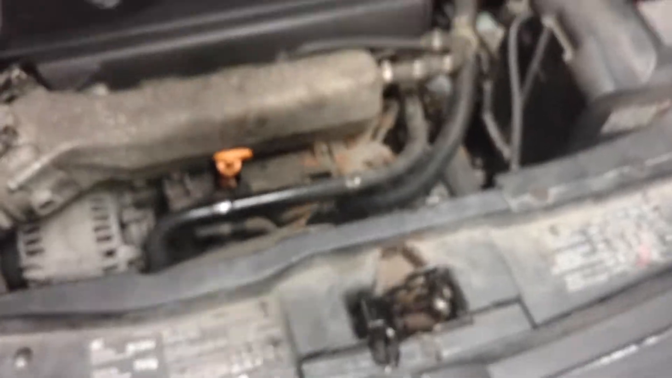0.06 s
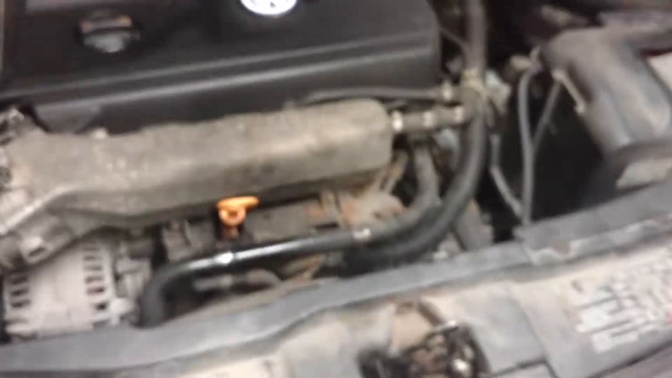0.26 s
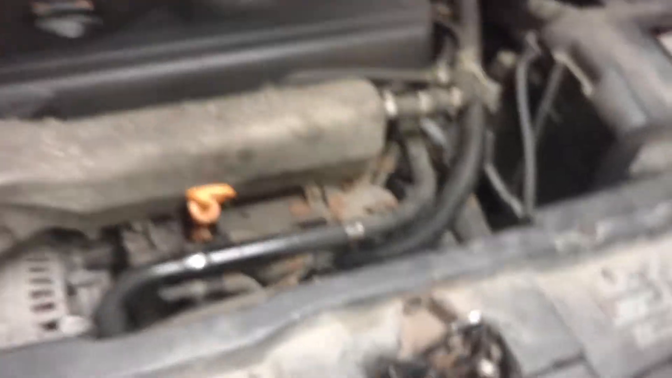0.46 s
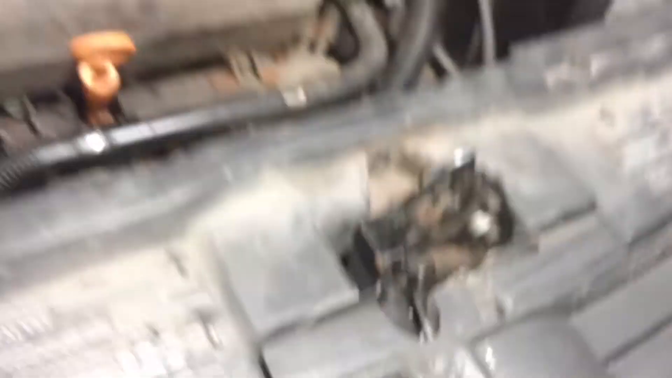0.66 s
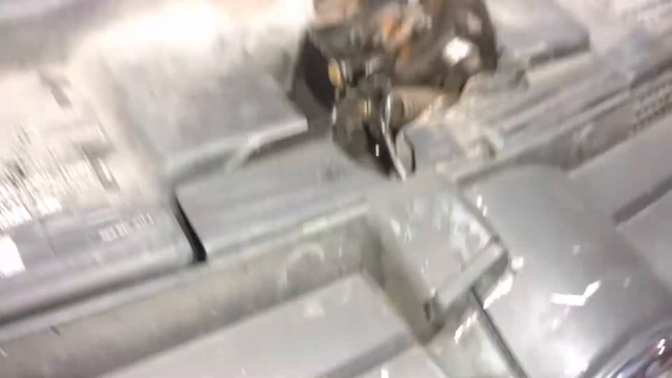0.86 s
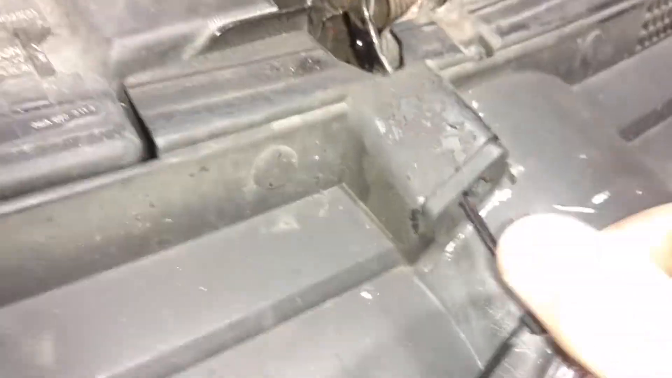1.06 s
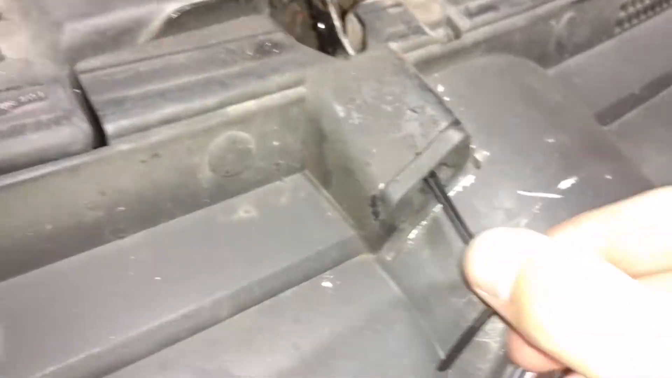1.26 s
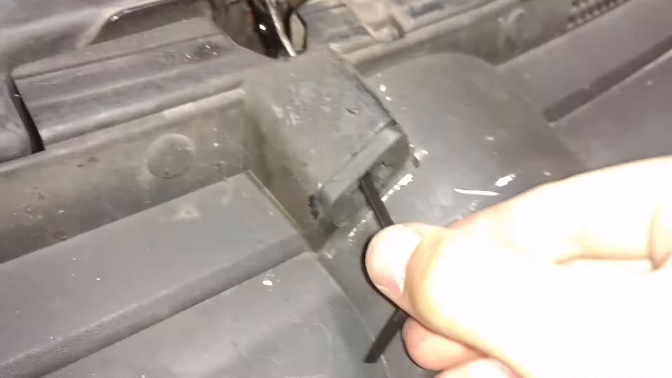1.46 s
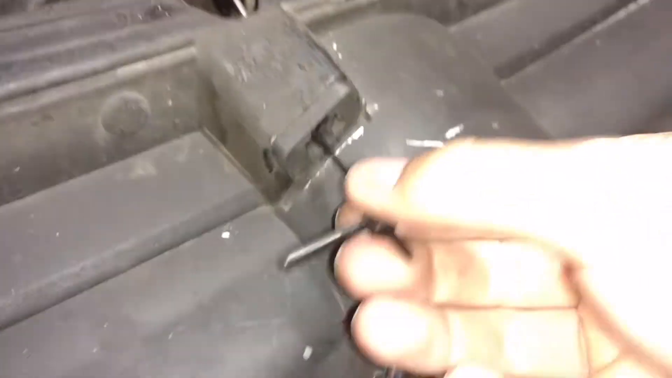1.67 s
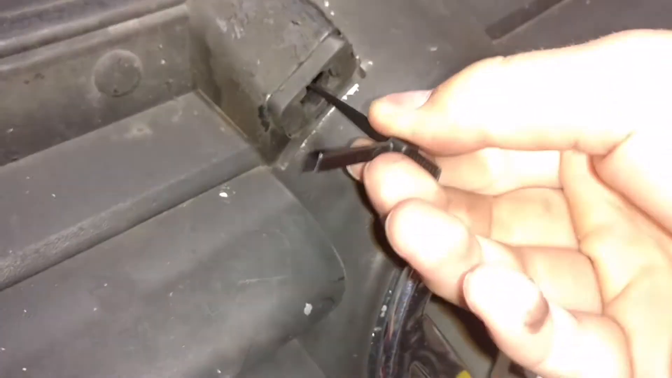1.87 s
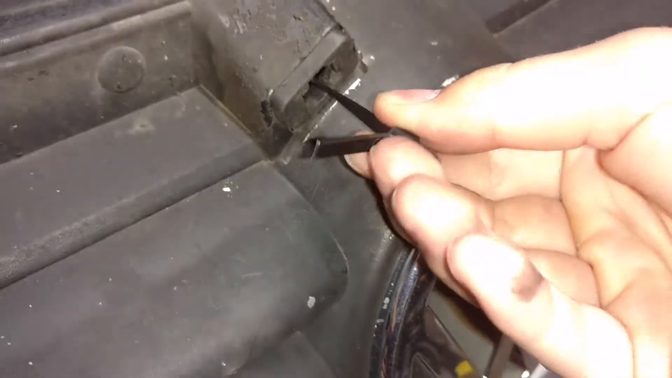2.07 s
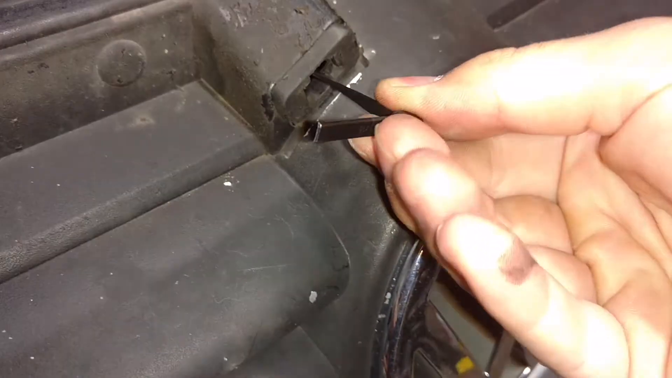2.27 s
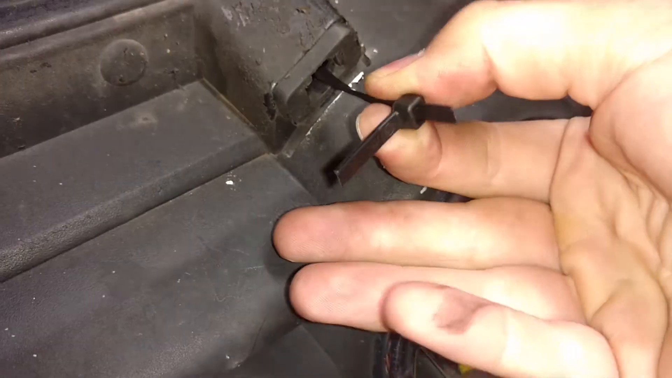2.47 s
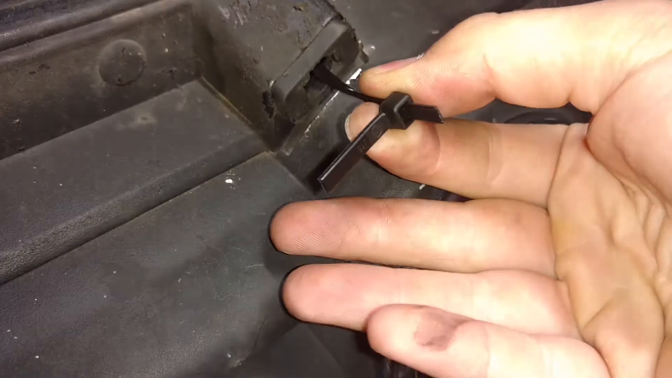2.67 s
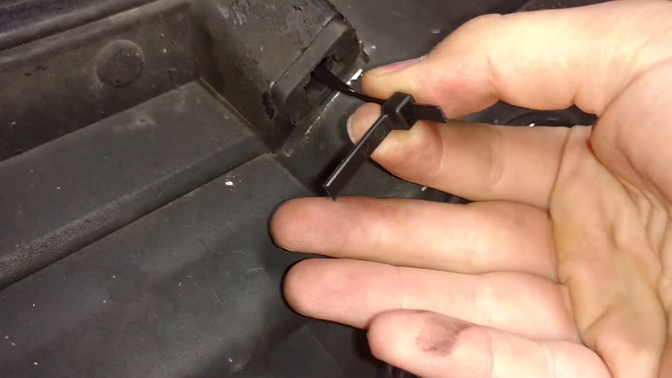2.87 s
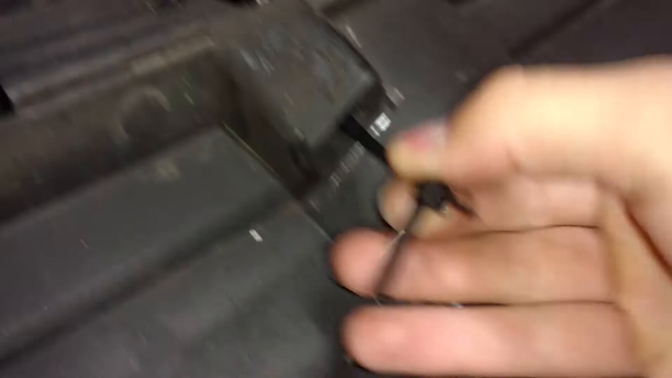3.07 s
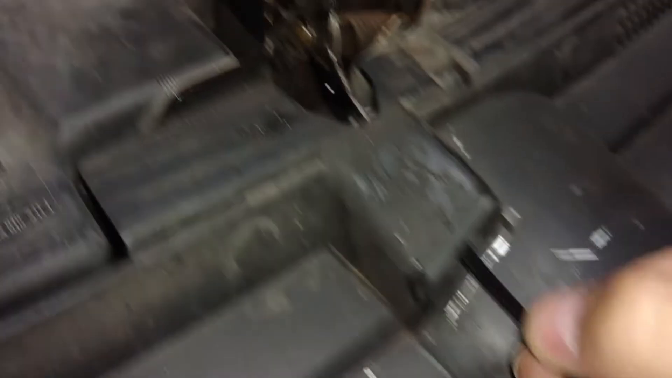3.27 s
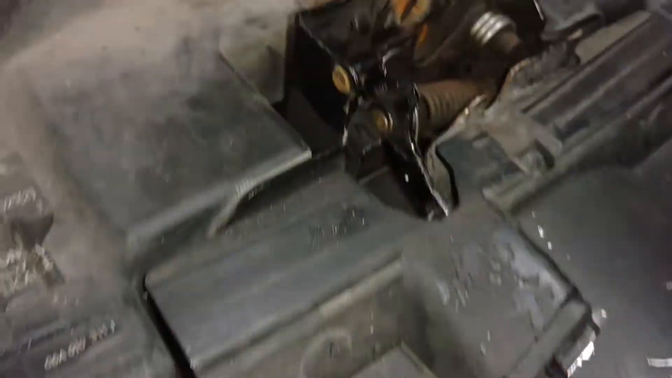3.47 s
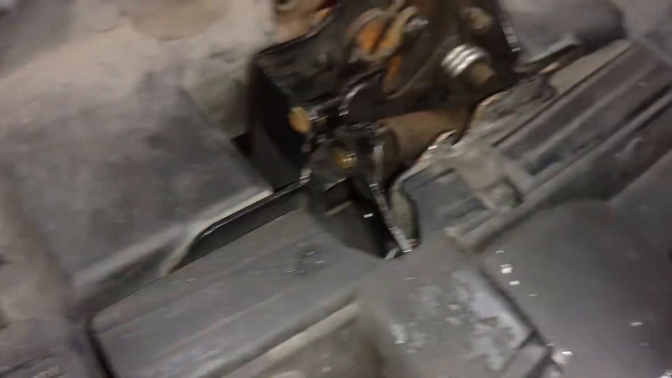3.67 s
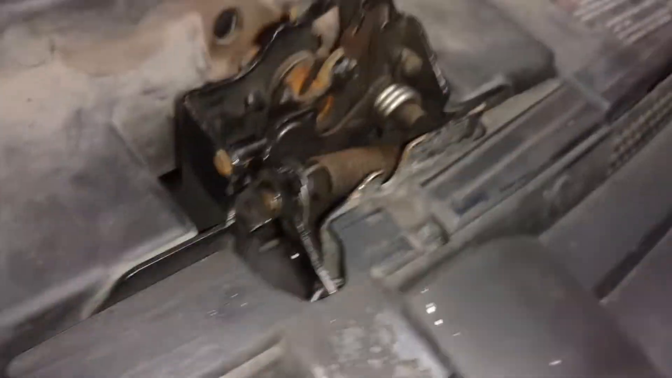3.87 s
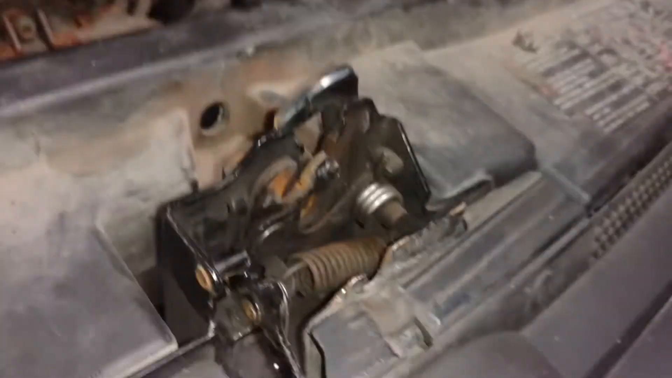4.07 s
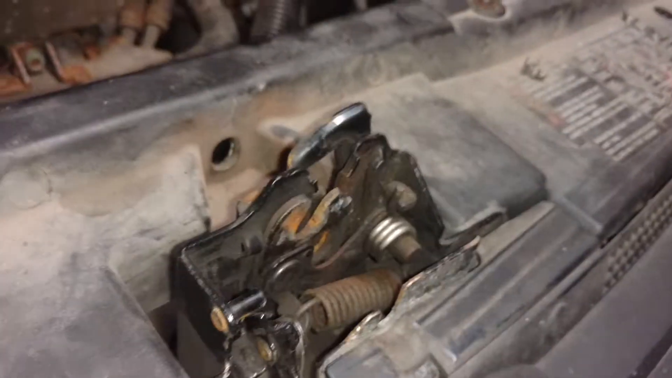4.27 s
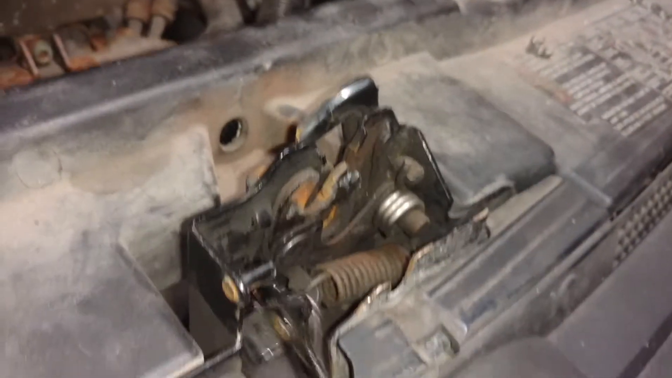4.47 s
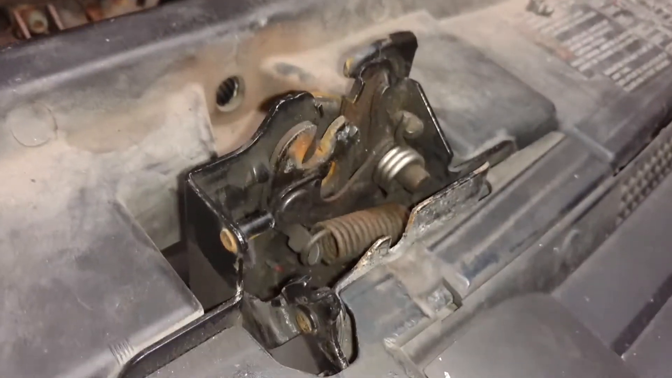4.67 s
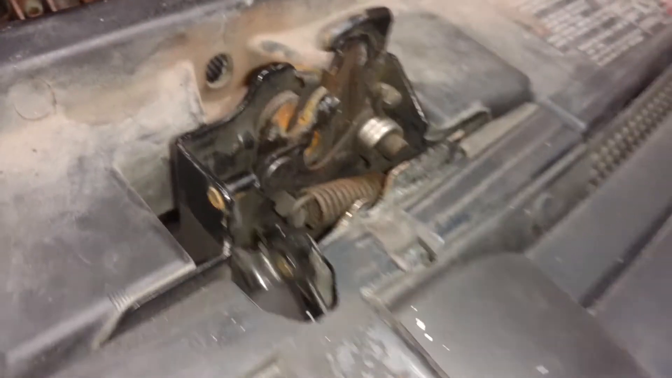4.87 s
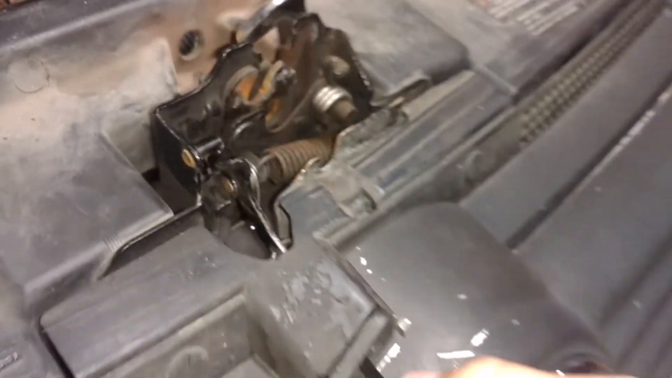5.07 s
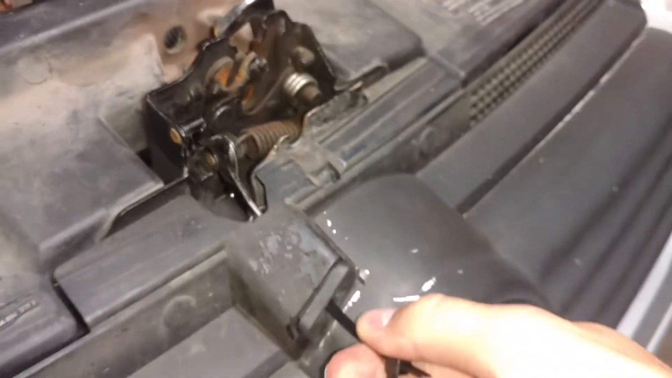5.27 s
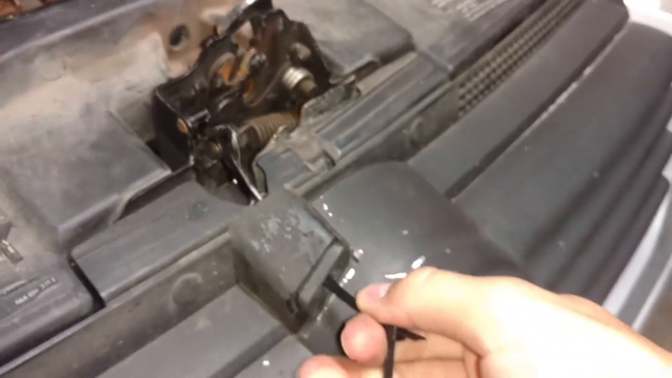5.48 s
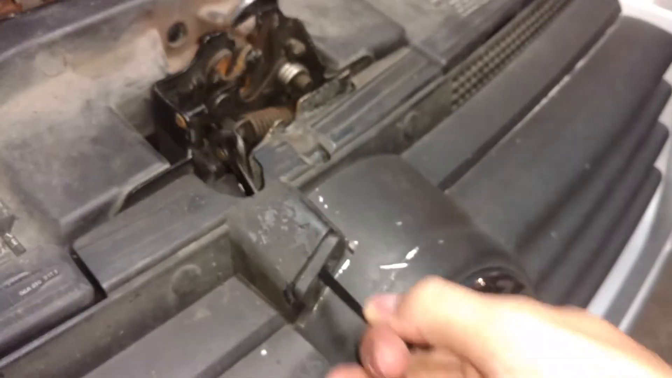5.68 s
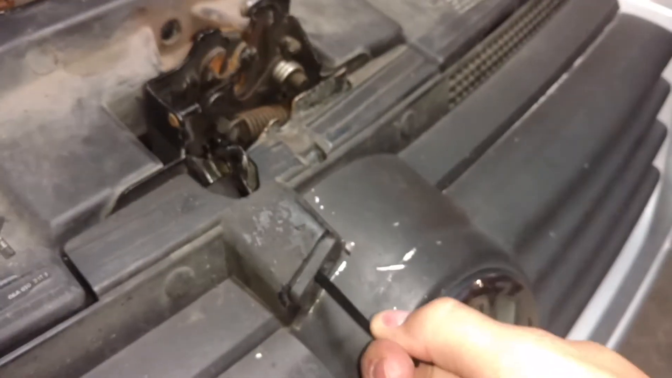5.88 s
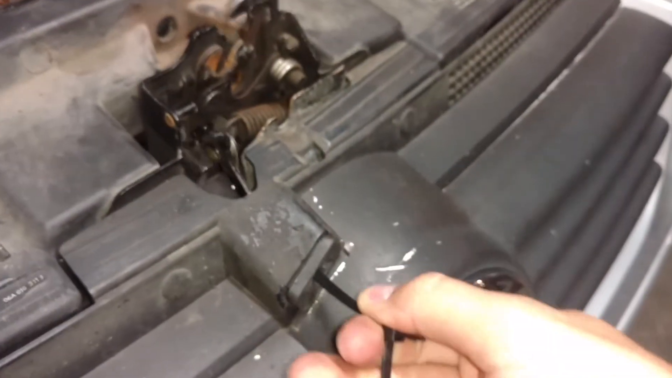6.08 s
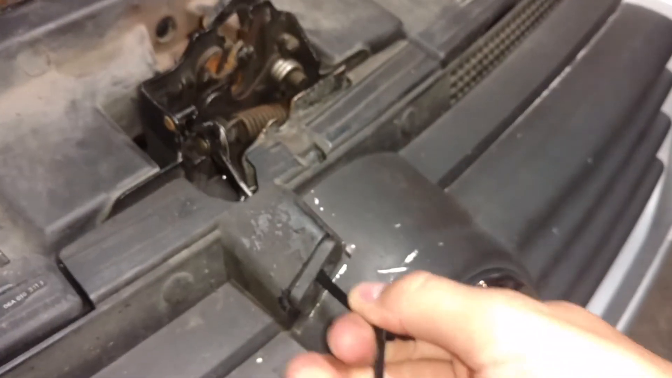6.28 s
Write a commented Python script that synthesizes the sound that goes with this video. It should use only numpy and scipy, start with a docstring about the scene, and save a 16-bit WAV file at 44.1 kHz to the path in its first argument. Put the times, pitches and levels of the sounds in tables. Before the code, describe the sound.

In a closed garage, a shoe scuffs once across the gritty floor. Fingers fumble a plastic pull tie on a car's front panel, making faint ticks and rubs. Then come three tugs: the cable drags in its guide and the steel hood latch knocks and snaps back, shaking the panel, the first tug the loudest. The stereo phone microphone is close, with soft air noise, a lamp hum and a short echo behind.

```python
"""A closed garage, at the front of a car, on a phone's two microphones. A shoe scuffs the gritty floor,
fingers fumble a plastic pull tie on the front panel, then tug it three times: the cable drags in its
guide and the steel hood latch knocks and snaps back, each contact shaking the panel.
Behind them are distant air noise, a soft lamp hum and the short echo of the walls.
The phone's stereo widening takes from each side a slightly later copy of the other."""
import sys
import numpy as np
from scipy import signal
from scipy.fft import rfft, irfft, next_fast_len
from scipy.io import wavfile
from scipy.ndimage import uniform_filter1d

SR = 44100
rng = np.random.default_rng(int(sys.argv[2]) if len(sys.argv) > 2 else 0)


def log_audio(samples):
    """Write samples as a 16-bit WAV file to the path given in sys.argv[1]."""
    # one column per channel
    frames = np.atleast_2d(samples).T
    # limit to full scale, then quantise
    limited = np.clip(frames, -1, 1)
    pcm = np.round(limited * 32767).astype(np.int16)
    wavfile.write(sys.argv[1], SR, pcm)


N = 278712


def amp(db):
    return 10 ** (np.asarray(db) / 20)


def unit_rms(x):
    return x / np.sqrt(np.mean(x ** 2) + 1e-20)


def along(points, hz):
    """Interpolate (frequency, value) points on a log frequency axis."""
    point_hz, values = np.transpose(points)
    return np.interp(np.log(hz + 1), np.log(point_hz + 1), values)


def filtered(x, response):
    """Pass x through a complex response of frequency."""
    size = next_fast_len(x.shape[-1] + 8192)
    return irfft(rfft(x, size) * response(np.fft.rfftfreq(size, 1 / SR)), size)[..., :x.shape[-1]]


def diffuse(pair, above_hz=950, bass_rad=0.13):
    """Two noises as a diffuse field at two microphones: alike in the bass, unrelated in the treble."""
    angle = lambda hz: bass_rad + (np.pi / 4 - bass_rad) / (1 + (above_hz / (hz + 1)) ** 2)
    mid, side = filtered(pair, lambda hz: np.array([np.cos(angle(hz)), np.sin(angle(hz))]))
    return np.array([mid + side, mid - side])


def room_tone(patchy_db=0.6):
    """Distant air noise in soft patches, with a wavering lamp hum."""
    # Background level, which dips after the loudest snap and creeps back: time_s, level_db
    levels = [(0, -41), (1, -42.5), (2.5, -41.5), (4.45, -42.5), (4.6, -53.5), (4.85, -52), (5.3, -48.5),
              (5.9, -43), (6.32, -50.5)]
    # Spectrum of the air noise: frequency_hz, relative_db
    air_spectrum = [(20, -21), (50, -8.5), (120, 2), (250, 2), (500, -9.5), (1100, -17), (2000, -24.5),
                    (4000, -33), (8000, -37), (12000, -44), (15000, -45.5), (15700, -64), (22000, -86)]
    # Lamp hum and whine at the start: pitch_hz, level_db
    lamp = [(120, -50.5), (240, -53), (360, -72.5), (1150, -64), (3230, -74.5), (4200, -85.5)]
    spectra = signal.stft(rng.standard_normal((2, N)), nperseg=512)[2]
    patches = uniform_filter1d(uniform_filter1d(rng.standard_normal(spectra.shape[1:]), 6, 0), 12, 1)
    depth = np.minimum(np.arange(len(patches)) / 9, 1)[:, None]  # the bass stays steady
    pair = signal.istft(spectra * amp(patchy_db * unit_rms(patches) * depth), nperseg=512)[1][:, :N]
    air = unit_rms(filtered(diffuse(pair), lambda hz: amp(along(air_spectrum, hz))))
    t = np.arange(N) / SR
    drift = np.cumsum(rng.standard_normal(N)) * 0.01143
    hum = 0
    for hz, db in lamp:
        phase = 2 * np.pi * hz * t + np.sqrt(hz / lamp[0][0]) * drift
        hum += np.sqrt(2) * amp(db - levels[0][1]) * np.sin(phase)
    return amp(np.interp(t, *np.transpose(levels))) * (air + hum)


def garage(x):
    """Echo off the walls, one tail per microphone; each frequency dies at its own speed."""
    # Reverberation time of the garage: frequency_hz, t60_s
    decay = [(200, 0.18), (1200, 0.42), (2500, 0.37), (4000, 0.55), (12000, 0.63)]
    hz, t, spectra = signal.stft(rng.standard_normal((2, SR // 2)), SR, nperseg=256)
    tail = signal.istft(spectra * amp(-60 * t / along(decay, hz)[:, None]), SR, nperseg=256)[1]
    tail = diffuse(filtered(tail, lambda f: 1 / (1 + (f / 4000) ** 2)))  # clutter swallows the treble
    delayed = np.pad(x, (400, 0))[None]
    return signal.fftconvolve(delayed, tail / np.linalg.norm(tail[0]), axes=1)[:, :N]


def strokes(rows, range_db=28, rise_bend=2.11, sag_db_per_s=28):
    """Gain per sample of each stroke: a rounded climb, a tiring hold, a steady fade."""
    peak_s, db, rise_s, hold_s, fade_s = np.transpose(rows)[:5, :, None]
    t = np.arange(0, N, 16) / SR - peak_s
    early, late = np.maximum(-t, 0) / rise_s, np.maximum(t - hold_s, 0) / fade_s
    gain = amp(db - range_db * (early ** rise_bend + late) - sag_db_per_s * np.clip(t, 0, hold_s))
    return np.repeat(gain, 16, axis=1)[:, :N]


def grit(per_second, size_db, smooth):
    """Sparse grains of uneven size on a bed of smooth noise."""
    struck = rng.random(N) < per_second / SR
    sizes = amp(size_db * np.minimum(rng.exponential(size=N), 3))
    grains = unit_rms(struck * sizes * rng.standard_normal(N))
    return unit_rms(grains + smooth * rng.standard_normal(N))


def shoe():
    """Grit crunches and hisses under the sliding sole."""
    # Slides of the sole: peak_s, level_db, rise_s, hold_s, fade_s
    scuffs = [(0.428, -36.5, 0.023, 0.0021, 0.048), (0.46, -49.5, .02, 0.085, .15),
              (0.626, -54, 0.0066, .003, 0.12), (0.66, -46, 0.0092, .003, 0.11),
              (0.764, -34, 0.014, .015, 0.09), (0.8, -18, 0.063, 0.11, 0.09), (0.99, -48, 0.058, .01, 0.34)]
    # Spectrum of sole on grit: frequency_hz, relative_db
    sole = [(200, -31), (600, -9.5), (950, -9), (1250, 2.5), (1700, -0.5), (2400, -5), (3100, -1),
            (3700, -9), (5000, -9.5), (8000, -17.5), (12000, -25), (15000, -30), (15700, -60)]
    crunch = grit(2000, size_db=1.5, smooth=2.5)
    return strokes(scuffs).sum(axis=0) * unit_rms(filtered(crunch, lambda hz: amp(along(sole, hz))))


def panel(lo_hz, hi_hz, favoured_hz=900, focus_db=0, spread_db=0):
    """Response of the panel's modes in one band; a positive focus favours those near one pitch."""
    # Resonances of the plastic panel and steel bracket: pitch_hz, width_hz, gain_db
    modes = [(138, 34, 4.5), (280.6, 58, 7), (528.6, 74, 6), (667.5, 68, -3), (729, 93, 5), (935, 95, 3.5),
             (1058, 59, 4), (1270, 190, 0), (1516, 120, 2), (1816, 260, -2.5), (2172, 225, -5.5),
             (2414, 164, -2), (2473, 540, -5.5), (3200, 820, -6), (4530, 220, -9), (6180, 3800, -16.5),
             (9000, 2500, -24.5)]
    hz, width, db = np.transpose(modes)
    distance = np.sqrt(abs(np.log2(hz / favoured_hz)))
    gain = amp(db + spread_db * rng.standard_normal(len(hz)) - focus_db * distance)
    in_band = [k for k in range(len(hz)) if lo_hz <= hz[k] < hi_hz]
    mode = lambda f, k: 1j * f * width[k] / (hz[k] ** 2 - f * f + 1j * f * width[k])
    soft = lambda f: 1 / (1 + 1j * f / (2 * hi_hz)) ** 2  # low parts move too slowly to give treble
    return lambda f: soft(f) * sum((-1) ** k * gain[k] * mode(f, k) for k in in_band)


def contacts(rows, blow):
    """A sharp blow and a dying rattle ring the panel; thud and snap levels are relative to the knock."""
    track, t = np.zeros(N + SR), np.arange(SR // 5) / SR
    fade = lambda t60_s: amp(-60 * t / t60_s)
    for start_s, knock_db, thud_db, snap_db, decay_s, pitch_hz in rows:
        thud = (0, 700, thud_db, 1.85, 15, 0.1, 0.013, 0.0053)
        knock = (700, 3120, 0, 0.71, 12, 0.98, 0.0092, 0.0066)
        snap = (3000, SR, snap_db, 0.7, -15, 6, 0.0076, 0.002)
        for lo_hz, hi_hz, band_db, stretch, focus_db, crack, crack_s, rise_s in (thud, knock, snap):
            envelope = (fade(stretch * decay_s) + crack * fade(crack_s)) * (1 - fade(rise_s))
            force = envelope * rng.standard_normal(len(t)) + blow * fade(0.00068)
            ring = filtered(force, panel(lo_hz, hi_hz, pitch_hz, focus_db, spread_db=0.5))
            track[round(start_s * SR):][:len(t)] += amp(knock_db + band_db) * ring / abs(ring).max()
    return track[:N]


def ticks():
    """Grit clicks, and fingertips tap the tie and panel."""
    # Light contacts: start_s, knock_db, thud_db, snap_db, base_decay_s, pitch_hz
    taps = [(0.423, -28.5, -17, 1.5, 0.067, 1310), (0.504, -42, -20, 4, 0.034, 1900),
            (0.558, -39.5, -18, -13, 0.02, 1270), (0.625, -37, -19, -3, 0.025, 1270),
            (0.659, -34, -22, -32, 0.08, 1540), (1.328, -28.5, -7.5, -27, 0.052, 864),
            (1.358, -37.5, 4.5, -27, 0.13, 540), (1.463, -34.5, -11, -10, 0.11, 1060),
            (1.595, -35, 5, -28, 0.051, 325), (1.906, -29, -11, -17, 0.061, 1410),
            (2.323, -47.5, 11, -19, 0.2, 603), (2.408, -23, -8, -15, 0.039, 1770),
            (2.414, -38, 7, 11, 0.079, 2400), (2.424, -42, 16.5, 5, 0.085, 584),
            (2.445, -55, 22.5, -24.5, 0.19, 141), (2.606, -45, -24, 6, 0.03, 2500),
            (2.668, -40, -16, -20, 0.033, 2200), (3.057, -19.5, -10, -20, 0.082, 1960),
            (3.12, -54, 6, 12.5, 0.024, 2300), (3.158, -47, 12.5, -20, 0.12, 550),
            (3.353, -51.5, 22, -7, 0.11, 530), (3.427, -27.5, -5.5, -13, 0.079, 830),
            (3.706, -39, -28, -20, 0.34, 2600), (5.349, -40, -5, -31, 0.022, 2360),
            (5.577, -36, -14, -15, 0.089, 1310)]
    return contacts(taps, blow=0.94)


def cable():
    """Stick-slip grains along the guide shake the panel; each stroke has its own brightness."""
    # Tie and cable rubbing in their guide: peak_s, level_db, rise_s, hold_s, fade_s, brightness_db
    drags = [(1.212, -38.5, 0.056, 0.0075, 0.025, -35), (1.293, -44, 0.02, 0.0024, 0.17, -17),
             (1.345, -46, 0.011, 0.017, 0.051, -15.5), (1.41, -54.5, .03, 0.11, .03, -11),
             (1.678, -51.5, 0.042, 0.051, .06, -13), (1.825, -45.5, 0.076, .003, 0.055, -13),
             (2.33, -48, 0.048, 0.1, .02, -26), (3.072, -40.5, .012, 0.039, 0.028, -12),
             (3.19, -60, 0.082, .01, .03, -25), (3.277, -49, .02, .005, 0.35, -13),
             (3.354, -63, .015, .005, 0.28, -10), (3.683, -45, .03, 0.019, 0.35, -13),
             (4.489, -24.5, 0.0061, .003, 0.028, -20), (4.515, -24.5, 0.018, 0.03, .02, -11.5),
             (4.897, -40, 0.034, 0.012, 0.18, -17), (5.656, -46.5, 0.038, 0.012, .05, -14.5),
             (5.746, -25, 0.074, .003, 0.065, -15), (6.088, -31.5, 0.068, 0.011, 0.29, -19),
             (6.173, -62, .012, .003, 0.12, -17)]
    pull = strokes(drags)
    hiss_gain = amp(np.transpose(drags)[-1]) @ pull
    slips = grit(700, size_db=-0.5, smooth=1.0)
    body = unit_rms(filtered(slips, panel(0, 1700)))
    hiss = unit_rms(filtered(slips, panel(2000, SR)))
    return pull.sum(axis=0) * body + hiss_gain * hiss


def latch():
    """The steel hood latch knocks under the pull and snaps back."""
    # Latch contacts: start_s, knock_db, thud_db, snap_db, base_decay_s, pitch_hz
    knocks = [(4.468, -7.5, -7.5, -48, 0.078, 905), (4.533, -3, -9, -26, 0.037, 715),
              (4.538, -2.5, -13.5, -14.5, 0.035, 2410), (4.548, -36.5, -19, 7, 0.12, 2400),
              (4.574, -14.5, -7.5, 2.5, 0.046, 1480), (4.897, -22, -7.5, -17, 0.067, 1190),
              (4.924, -37.5, 9, -18, 0.14, 555), (5.02, -9.5, -11, -11, 0.12, 1370),
              (5.668, -24.5, -3.5, -12, 0.14, 686), (5.711, -24.5, 5.5, -26, 0.071, 695),
              (5.734, -16, -16, -6, 0.19, 714), (5.753, -18, 4, -1.5, 0.037, 293),
              (5.772, -29.5, 8.5, 7, 0.065, 320), (5.788, -46.5, 18.5, -20, 0.61, 138),
              (6.046, -22.5, -4, -12.5, 0.054, 1300), (6.077, -41, -8, 7, 0.096, 1520),
              (6.086, -13.5, -1.5, -19.5, 0.07, 750), (6.094, -18.5, 2, -36, 0.097, 810),
              (6.154, -6, -9.5, -9.5, 0.09, 1400), (6.316, -26.5, -8, -32, 0.03, 890)]
    return contacts(knocks, blow=1.38)


def direct_sound(x, bass_rad=0.64, treble_rad=2.17, above_hz=1800):
    """Hand and panel scatter mostly treble: the phase at the right microphone wanders as it moves."""
    hz, _, spectra = signal.stft(x, SR, nperseg=256)
    wander = unit_rms(uniform_filter1d(uniform_filter1d(rng.standard_normal(spectra.shape), 11, 0), 12, 1))
    phase = wander * (bass_rad + treble_rad / (1 + (above_hz / (hz[:, None] + 1)) ** 4))
    right = signal.istft(spectra * np.exp(1j * phase), SR, nperseg=256)[1][:N]
    return np.array([x, right])


def scene():
    """The car close to the phone, the shoe with more echo on it, room tone behind both."""
    car = ticks() + latch() + cable()
    foot = shoe()
    return direct_sound(car + foot) + amp(-24.5) * garage(car) + amp(-19.5) * garage(foot) + room_tone()


def record(dry, widening=0.6, lag_samples=17, shelf_hz=1900, right_cut_hz=65, top_hz=16435):
    """The phone: a right microphone weaker in the bass, stereo widening, lows shelved, top cut off."""
    shelf = lambda hz, db: amp(db / (1 + (hz / shelf_hz) ** 4))
    right = filtered(dry[1], lambda hz: amp(0.69) * shelf(hz, -2.5) * 1j * hz / (right_cut_hz + 1j * hz))
    mics = np.array([dry[0], right])
    late_opposite = np.pad(mics[::-1], ((0, 0), (lag_samples, 0)))[:, :N]
    wide = mics - widening * late_opposite
    return filtered(wide, lambda hz: shelf(hz, -7) * (hz < top_hz) / np.sqrt(1 + (hz / 14500) ** 12))


dry = scene()
out = record(dry)
log_audio(out)
```